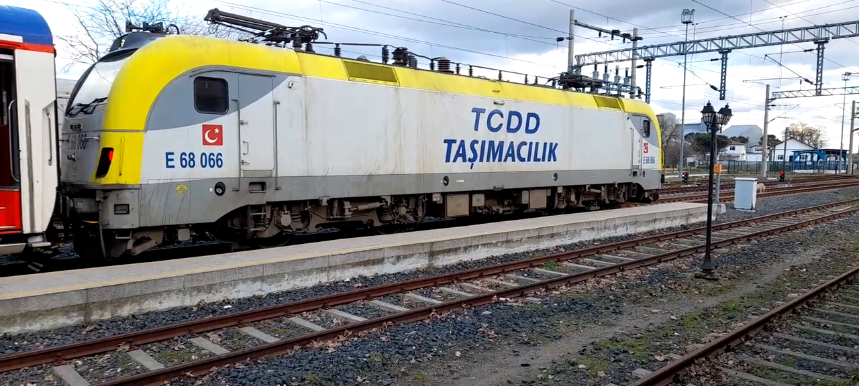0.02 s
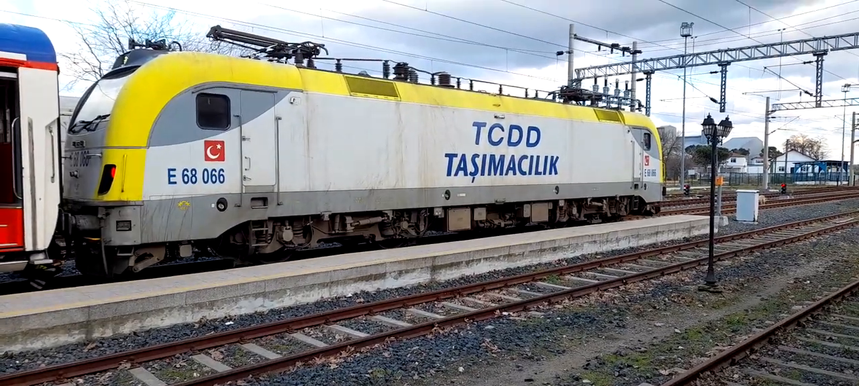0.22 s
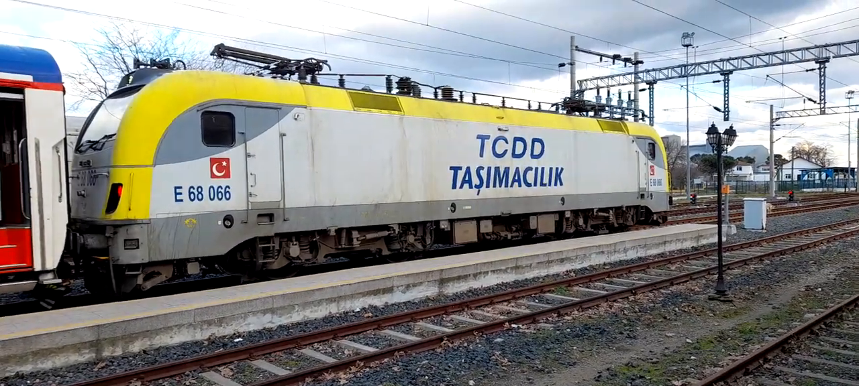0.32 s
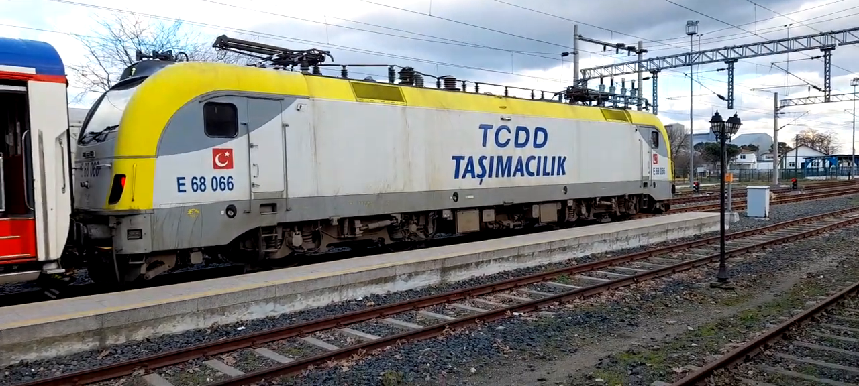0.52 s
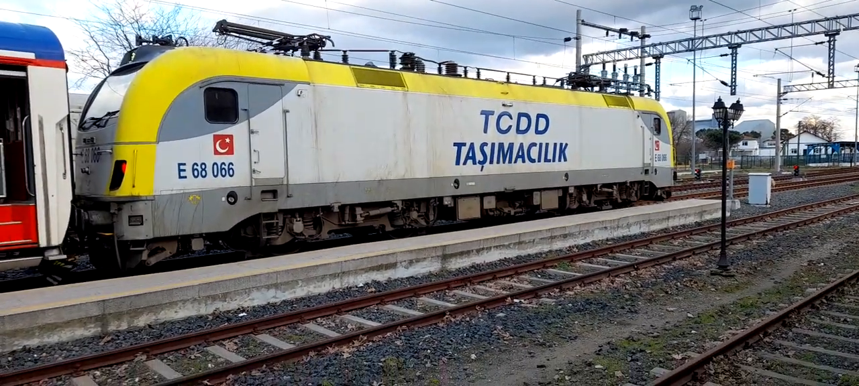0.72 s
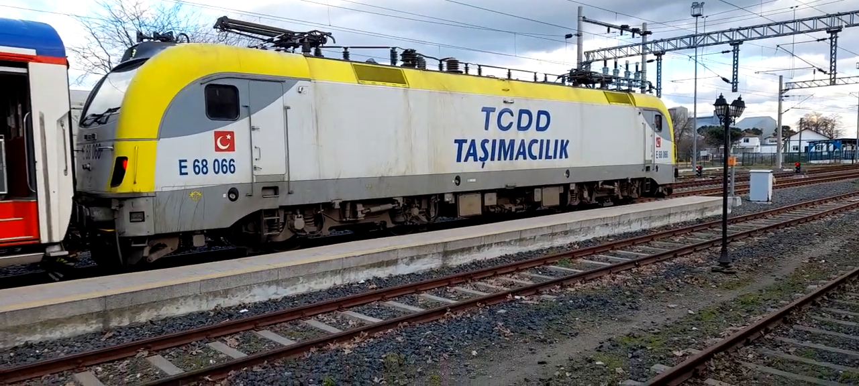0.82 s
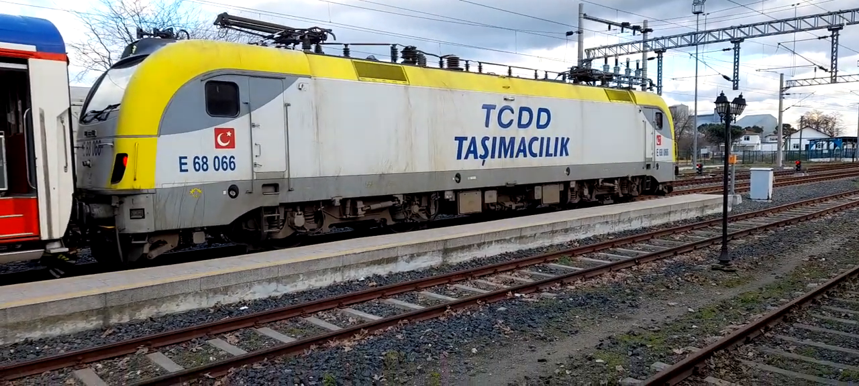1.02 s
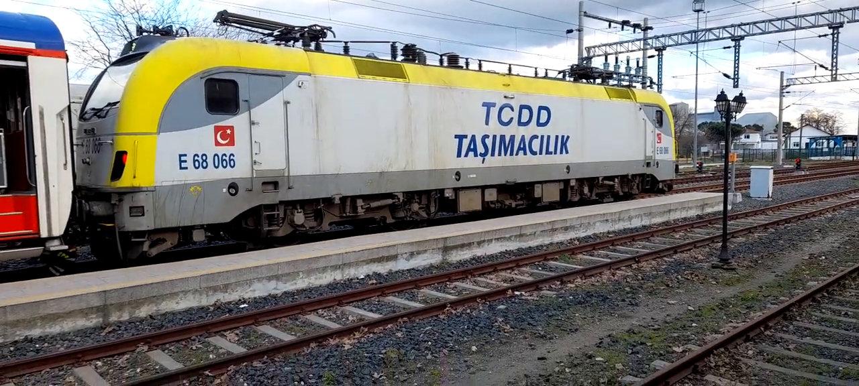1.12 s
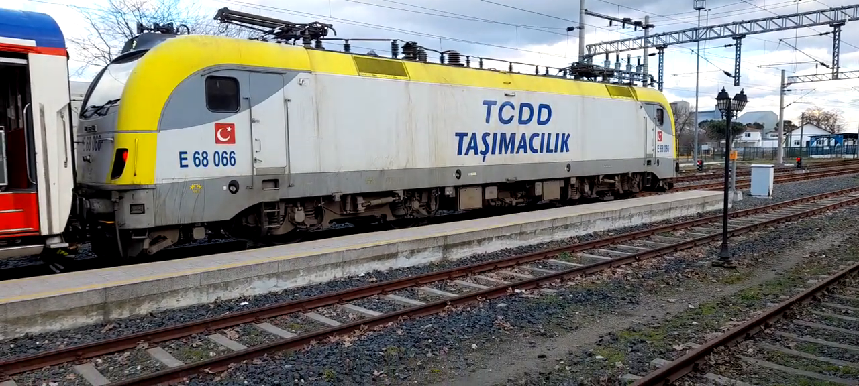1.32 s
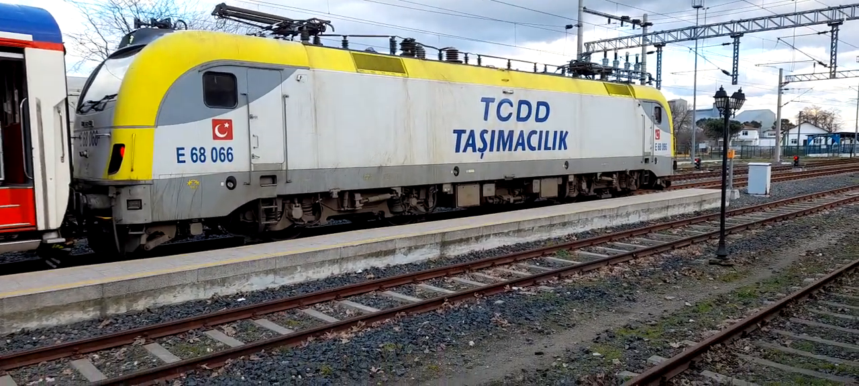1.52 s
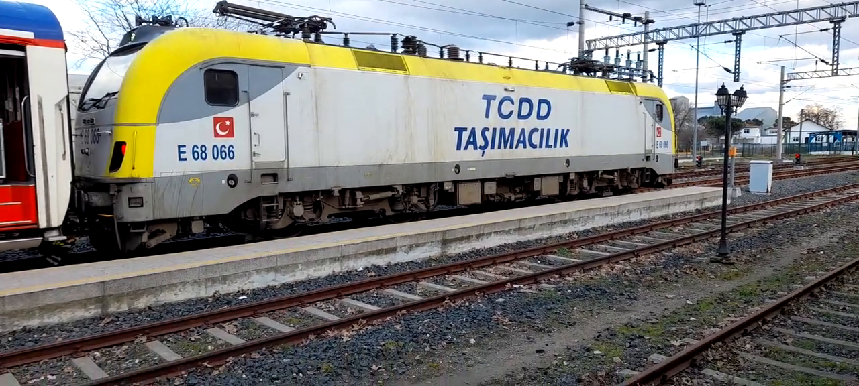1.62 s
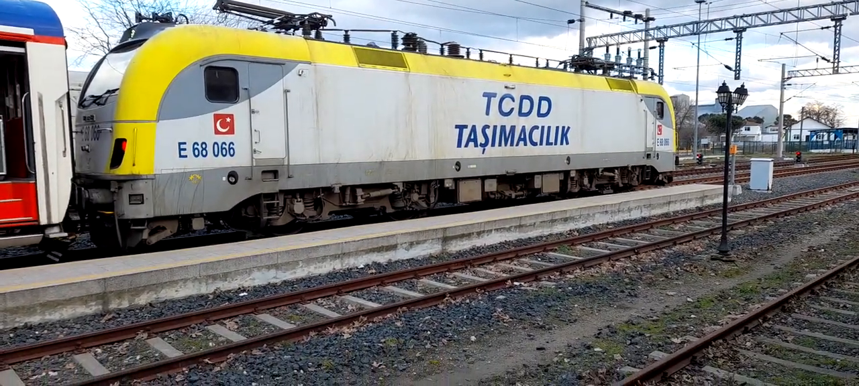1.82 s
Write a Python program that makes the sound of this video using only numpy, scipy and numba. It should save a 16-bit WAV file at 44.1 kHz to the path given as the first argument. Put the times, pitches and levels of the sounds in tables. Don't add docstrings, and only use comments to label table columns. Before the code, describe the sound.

A sudden loud blast of compressed air hisses from a standing locomotive, then cuts off

```python
import sys
import numpy as np
from scipy import signal
from scipy.fft import rfft, irfft
from scipy.io import wavfile
from scipy.ndimage import uniform_filter1d, map_coordinates
from numba import njit

SR = 44100
rng = np.random.default_rng(int(sys.argv[2]) if len(sys.argv) > 2 else 0)


def gain_from_db(level_db):
    decades = np.asarray(level_db, float) / 20
    return 10 ** decades


def put_to_file(sound):
    columns = np.atleast_2d(sound).T
    safe = np.clip(columns, -1, 1)
    whole_steps = np.round(safe * 32767)
    wavfile.write(sys.argv[1], SR, whole_steps.astype(np.int16))


N = 83790

# f/Hz, density/dB
STATION_SPECTRUM = [(100, -40), (170, -15.5), (320, 5), (600, -8.5), (1900, -9), (3600, -34), (6500, -34.5),
                    (15000, -47)]
# t/s, level/dB
WIND_GUSTS = [(0, -3), (.12, -4.5), (.22, -5.5), (.4, 0.5), (.7, 0), (1.0, -2.5), (1.28, -5), (1.45, 4.5),
              (1.6, -6), (1.9, -0.5)]
# f/Hz, density/dB
JET_SPECTRUM = [(100, -19.5), (220, -0.5), (700, -3.5), (1400, -0.5), (1650, 2.5), (4000, 1), (10200, -1.5),
                (11500, 0)]
# t/s, centre f/Hz, level/dB, width/Hz
GAP_WHISTLE = [
    (0.232, 4970, -41, 300),
    (0.239, 5530, -14.5, 300),
    (.252, 6340, -9, 350),
    (0.263, 7270, -13.5, 632),
    (.272, 9070, -8, 900),
    (0.283, 11160, -14, 1193),
    (.3, 12220, -29, 1500),
    (.32, 13500, -60.5, 1528),
]
# f/Hz, T60/s
YARD_DECAY = [(150, 0.86), (400, 1.26), (2000, 0.88), (5000, 0.63), (9000, 0.34), (14000, 0.38)]
# f/Hz, gain/dB
LEFT_PORT_RESPONSE = [(400, -12.5), (1200, -8.5), (2500, -9.5), (3500, -7), (6700, 5.5), (8200, -10),
                      (11700, 3), (15700, -3)]
RIGHT_PORT_RESPONSE = [(700, -9), (1800, -3), (5100, -9), (6850, 4.5), (8100, -5), (11300, -5.5),
                       (13200, -4), (15100, 4)]

STATION_DB, STATION_PAN_DB = -45, -1.5
FAN_HZ, FAN_WIDTH_HZ, FAN_DB = 316, 16, -55
WIND_HZ, WIND_WIDTH_HZ, WIND_DB, WIND_PAN_DB, GUST_DB = 81, 75, -37, -5, 3.5
LEAKS_S, LEAK_DB, LEAK_RISE_DB_PER_S = 0.22, -42.5, 499
OPENS_S, RISE_S, SURGE_DB, SURGE_S = 0.2381, 0.036, -0.5, 0.018
SHUTS_S, SHUT_ROUND_S, FALL_T60_S = 1.293, 0.0127, 0.14
JET_DB, SPIT_DB, WHISTLE_GAIN_DB = -3.5, 1, 3.5
PIPE_HZ, PIPE_WIDTH_HZ, PIPE_DB, PIPE_SWELL_DB_PER_S = 300, 49.5, -25.5, 7
RIGHT_LAG_S = 0.00031
SHARED_BASS, SHARED_TREBLE, SHARED_EDGE_HZ = 0.81, 0.4, 2100
NEAR_DB, NEAR_T60_S = -3, 0.12
YARD_DB, YARD_DELAY_S = -13.5, 0.009
AGC_THRESHOLD_DB, AGC_RATIO, AGC_ATTACK_S, AGC_RELEASE_S = -34, 1.368, 0.013, 6
CIRCUIT_HISS_DB, TOP_CUT_HZ = -94.5, 15750

BIN_HZ = np.arange(N // 2 + 1) * SR / N


def level(x, rms_db):
    return x * gain_from_db(rms_db) / np.sqrt(np.mean(x ** 2))


def colour(x, response):
    hz, db = np.array(response).T
    gain_db = np.interp(np.log(BIN_HZ + 1), np.log(hz), db)
    return irfft(rfft(x) * gain_from_db(gain_db), N)


@njit
def bandpass(x, hz, width_hz):
    y, band, low = np.empty(len(x)), 0., 0.
    for i in range(len(x)):
        g = np.tan(np.pi * hz[i] / SR)
        k = width_hz[i] / hz[i]
        v = (band + g * (x[i] - low)) / (1 + g * (g + k))
        band = 2 * v - band
        low = low + 2 * g * v
        y[i] = k * v
    return y


@njit
def follow(x, attack, release):
    y, e = np.empty(len(x)), 0.
    for i in range(len(x)):
        e += (x[i] - e) * (attack if x[i] > e else release)
        y[i] = e
    return y


def walk(rate_hz):
    hold = int(SR / rate_hz)
    steps = np.repeat(rng.standard_normal(N // 8), hold)[:N]
    return 1.3 * uniform_filter1d(uniform_filter1d(steps, hold), hold)


def pair(shared):
    common, left, right = rng.standard_normal((3, N))
    late = map_coordinates(common, [np.arange(N) - RIGHT_LAG_S * SR], mode="wrap")
    return np.sqrt(shared) * np.array([common, late]) + np.sqrt(1 - shared) * np.array([left, right])


def ring(x, hz, width_hz):
    hz, width_hz = hz * np.ones(N), width_hz * np.ones(N)
    rung = np.array([bandpass(bandpass(c, hz, width_hz), hz, width_hz) for c in x])
    return level(rung / np.sqrt(width_hz), 0)


def station():
    wash = level(colour(pair(0.4), STATION_SPECTRUM), STATION_DB) * gain_from_db(1.2 * walk(4))
    fan = ring(pair(0.87), FAN_HZ, FAN_WIDTH_HZ) * gain_from_db(FAN_DB)
    return (wash + fan) * gain_from_db(STATION_PAN_DB * np.array([[0.5], [-0.5]]))


def wind(t):
    left_db = GUST_DB * walk(25) + WIND_PAN_DB / 2
    right_db = GUST_DB * walk(18) - WIND_PAN_DB / 2
    gusts_db = np.interp(t, *np.array(WIND_GUSTS).T)
    rumble = ring(pair(0.15), WIND_HZ, WIND_WIDTH_HZ)
    return rumble * gain_from_db(WIND_DB + np.array([left_db, right_db]) + gusts_db)


def echo(x, tail, gain_db):
    tail = tail / np.sqrt(np.sum(tail ** 2) / 2)
    return signal.fftconvolve(x, tail, axes=1)[:, :N] * gain_from_db(gain_db)


def yard(x, t):
    hz, t60_s = np.array(YARD_DECAY).T
    log_f = np.log(BIN_HZ + 1)
    tail = 0
    for k in range(len(hz)):
        band = np.interp(log_f, np.log(hz), np.arange(len(hz)) == k)
        noise = irfft(rfft(rng.standard_normal((2, N))) * np.sqrt(band), N)
        tail = tail + noise * gain_from_db(-60 * t / t60_s[k])
    return echo(x, tail * (t > YARD_DELAY_S), YARD_DB)


def near(x, t):
    tail = rng.standard_normal((2, N // 4)) * gain_from_db(-60 * t[:N // 4] / NEAR_T60_S)
    return echo(x, tail, NEAR_DB)


def whistle(t):
    s, hz, db, width_hz = np.array(GAP_WHISTLE).T
    centre_hz = np.interp(t, s, hz) * (1 + 0.016 * walk(300))
    tone = ring(pair(0.46), centre_hz, np.interp(t, s, width_hz))
    return tone * gain_from_db(np.interp(t, s, db, left=-120, right=-120) + WHISTLE_GAIN_DB)


def valve(t):
    after_s = np.clip(t - OPENS_S, 0, None)
    leak_db = LEAK_DB + LEAK_RISE_DB_PER_S * (np.minimum(t, OPENS_S) - LEAKS_S)
    leak = (t > LEAKS_S) * gain_from_db(leak_db)
    opening = (1 - np.exp(-after_s / RISE_S)) * gain_from_db(SURGE_DB * np.exp(-after_s / SURGE_S))
    shut_s = SHUT_ROUND_S * np.logaddexp(0, (t - SHUTS_S) / SHUT_ROUND_S)
    return (leak + opening) * gain_from_db(-60 * shut_s / FALL_T60_S)


def jet(t):
    bass = 1 / (1 + (BIN_HZ / SHARED_EDGE_HZ) ** 4)
    bass_part = rfft(pair(SHARED_BASS)) * np.sqrt(bass)
    treble_part = rfft(pair(SHARED_TREBLE)) * np.sqrt(1 - bass)
    noise = rfft(colour(irfft(bass_part + treble_part, N), JET_SPECTRUM))
    common_waver = walk(5)
    octave = np.clip(np.log2(BIN_HZ + 1), 7, 14)
    hiss = 0
    for centre in range(7, 15):
        band = np.clip(1 - np.abs(octave - centre), 0, 1)
        waver_db = 0.6 * common_waver + 0.4 * walk(13.77)
        hiss = hiss + irfft(noise * band, N) * gain_from_db(waver_db)
    hiss = level(hiss * gain_from_db(SPIT_DB * walk(700)), JET_DB)
    pipe_db = PIPE_DB + PIPE_SWELL_DB_PER_S * (t - 0.5)
    pipe = ring(pair(0.8), PIPE_HZ, PIPE_WIDTH_HZ) * gain_from_db(pipe_db)
    return valve(t) * (hiss + pipe)


def scene():
    t = np.arange(N) / SR
    air = jet(t) + whistle(t)
    air = air + near(air, t) + yard(air, t)
    left, right = colour(air[0], LEFT_PORT_RESPONSE), colour(air[1], RIGHT_PORT_RESPONSE)
    return station() + wind(t) + np.array([left, right])


def band_limit(x):
    return signal.sosfilt(signal.butter(12, 17060, fs=SR, output="sos"), x)


def record(dry):
    peak = np.abs(dry).max(axis=0)
    envelope = follow(peak, 1 / (AGC_ATTACK_S * SR), 1 / (AGC_RELEASE_S * SR))
    below = np.minimum(gain_from_db(AGC_THRESHOLD_DB) / (envelope + 1e-9), 1)
    gain = below ** (1 - 1 / AGC_RATIO)
    hiss = gain_from_db(CIRCUIT_HISS_DB) * rng.standard_normal(dry.shape)
    x = np.clip(dry * gain + hiss, -0.98, 0.98)
    x = irfft(rfft(x) * (BIN_HZ < TOP_CUT_HZ), N)
    return band_limit(x)


dry = scene()
out = record(dry)
put_to_file(out)
```